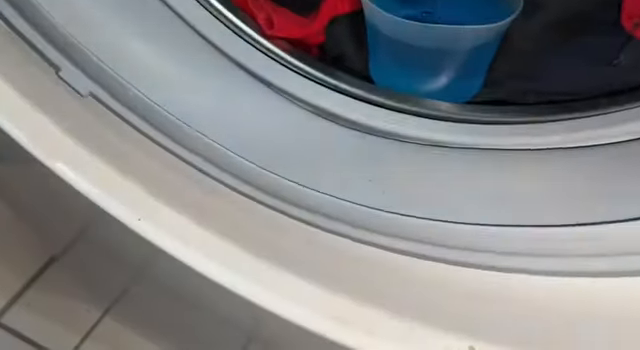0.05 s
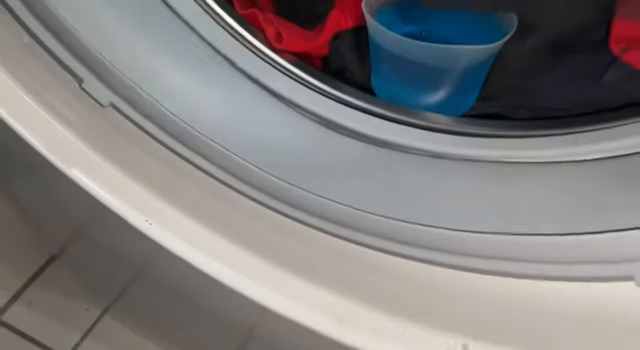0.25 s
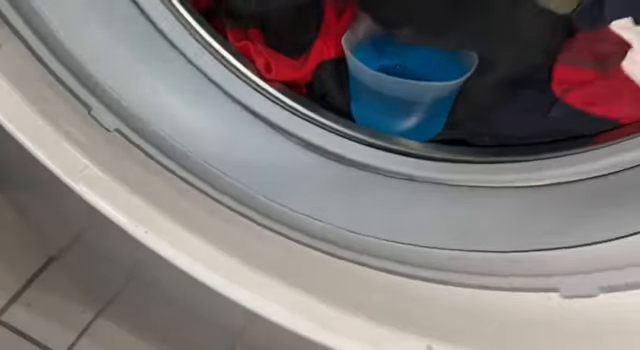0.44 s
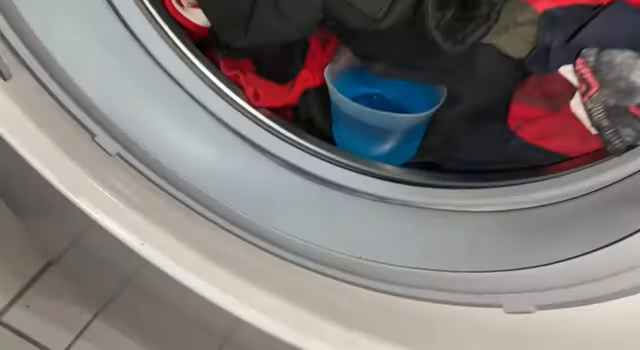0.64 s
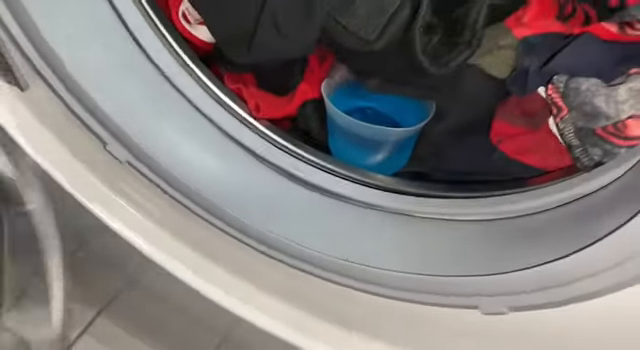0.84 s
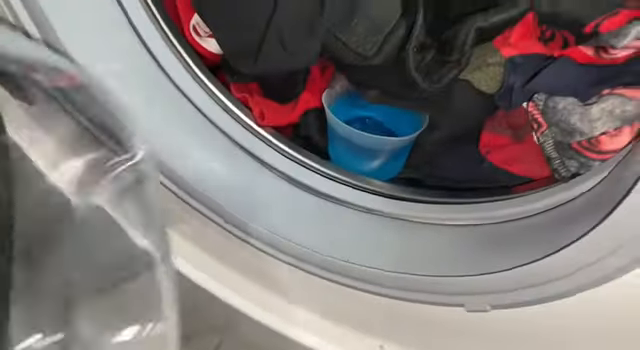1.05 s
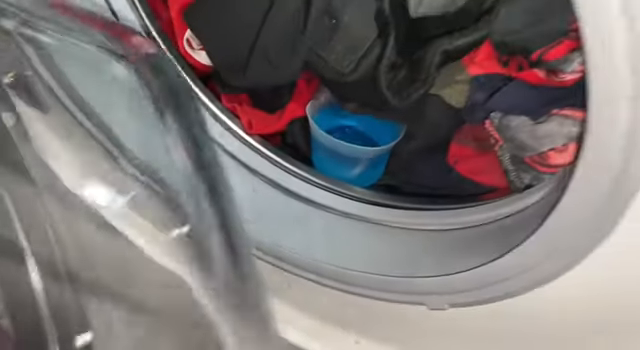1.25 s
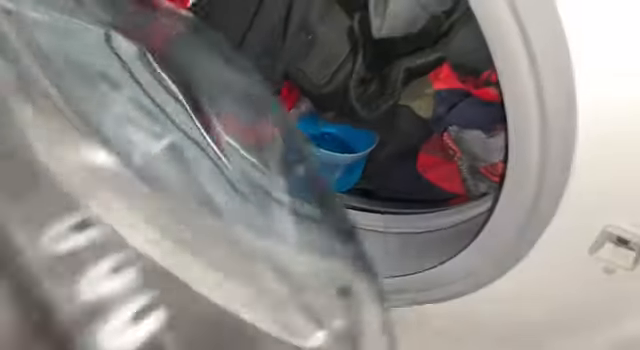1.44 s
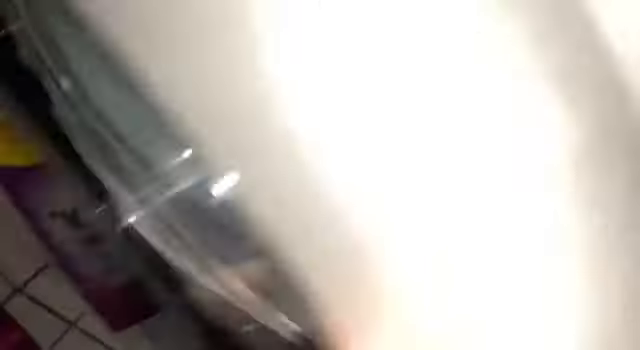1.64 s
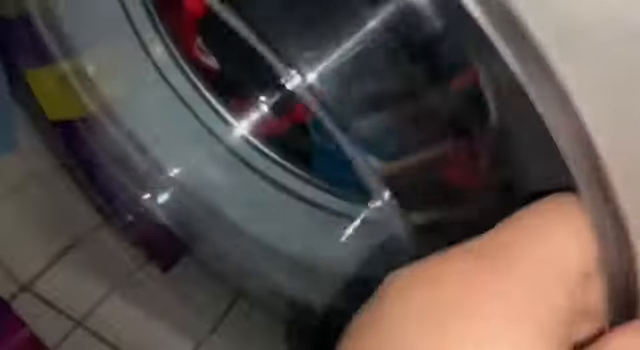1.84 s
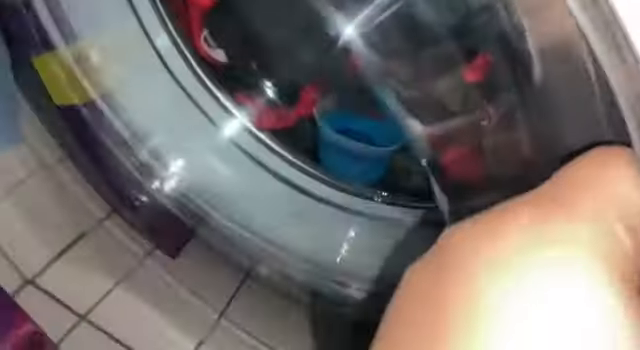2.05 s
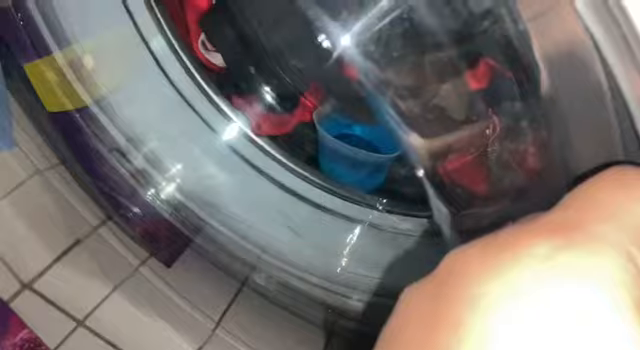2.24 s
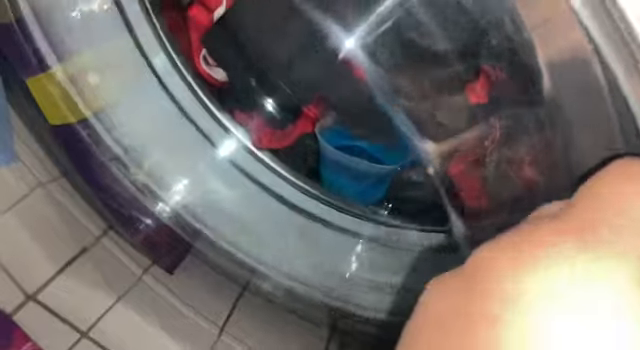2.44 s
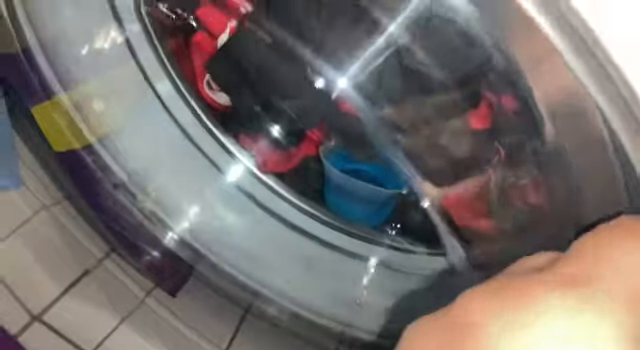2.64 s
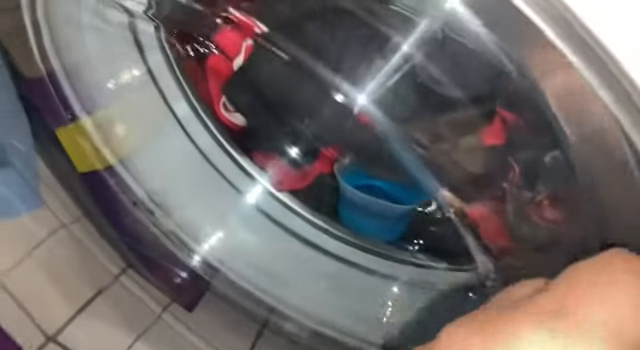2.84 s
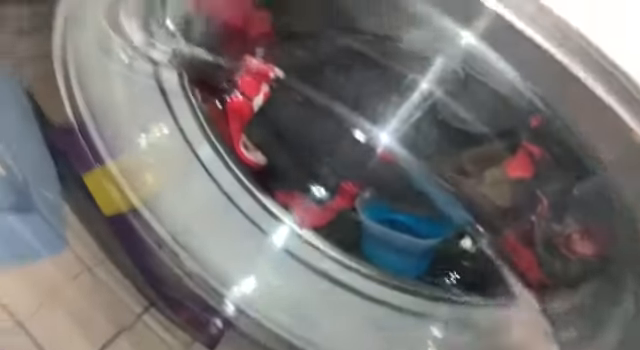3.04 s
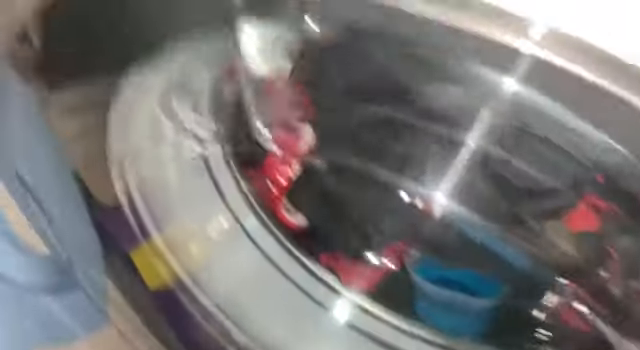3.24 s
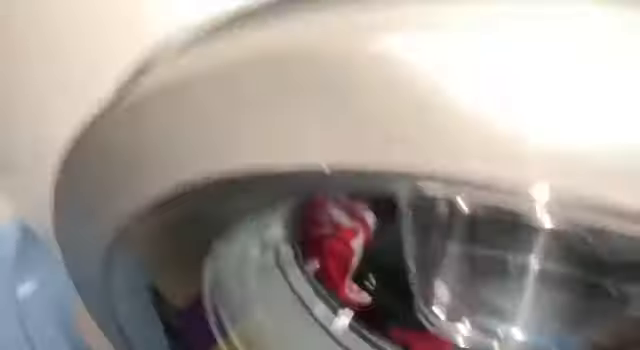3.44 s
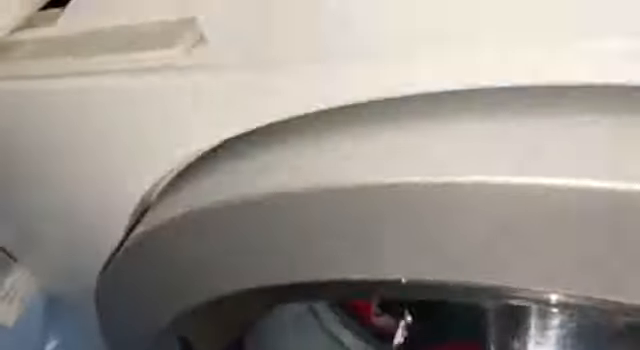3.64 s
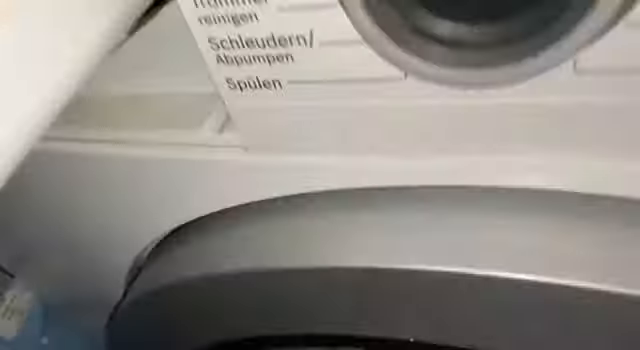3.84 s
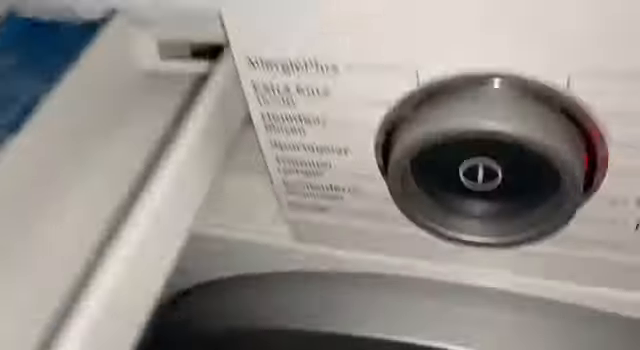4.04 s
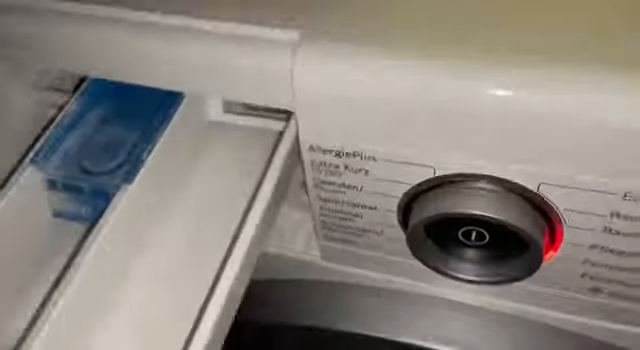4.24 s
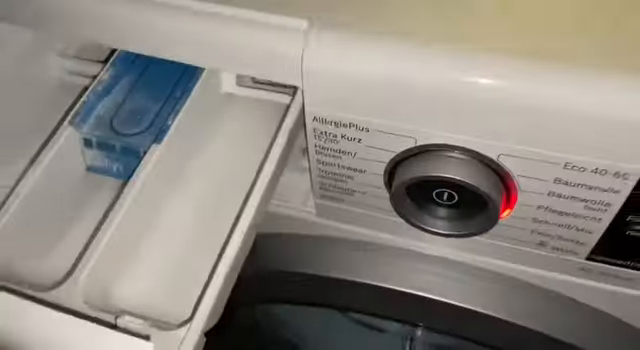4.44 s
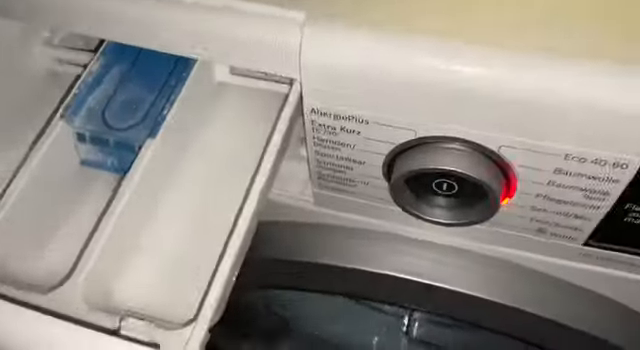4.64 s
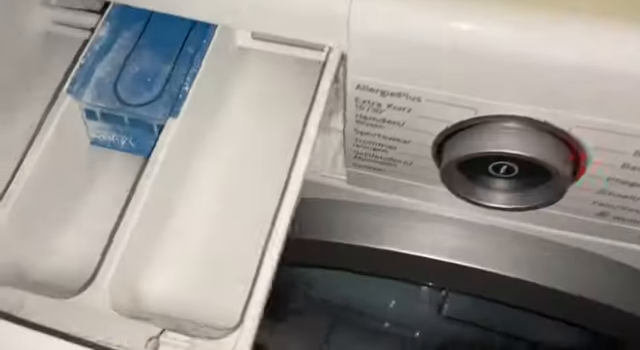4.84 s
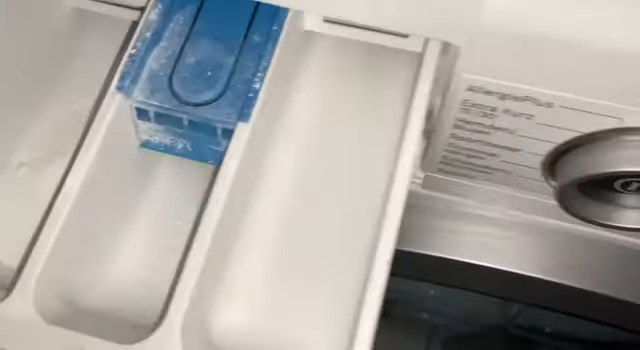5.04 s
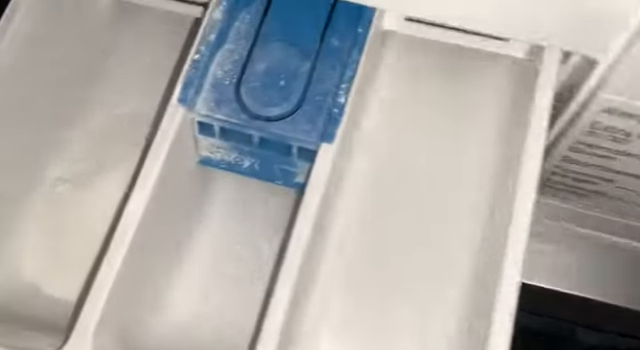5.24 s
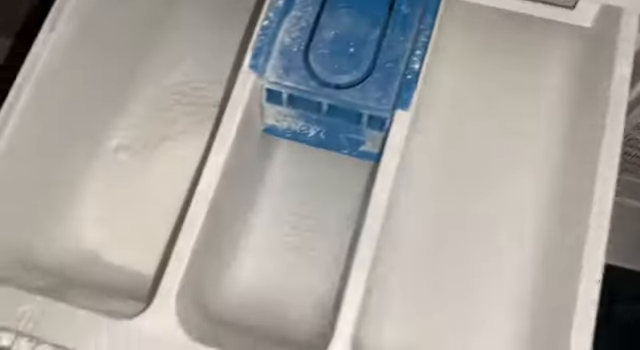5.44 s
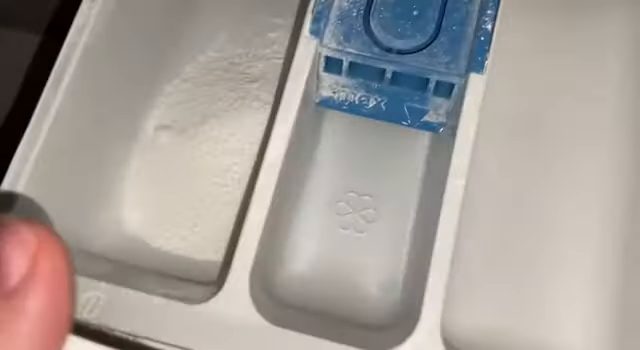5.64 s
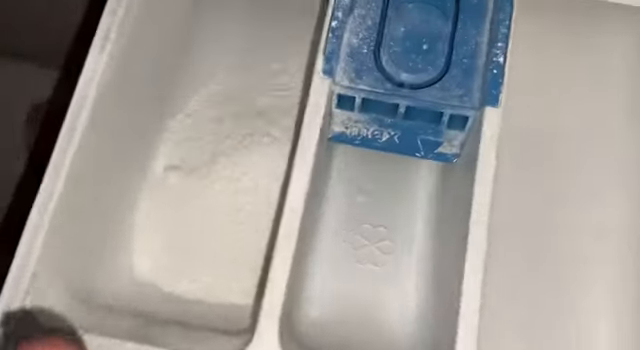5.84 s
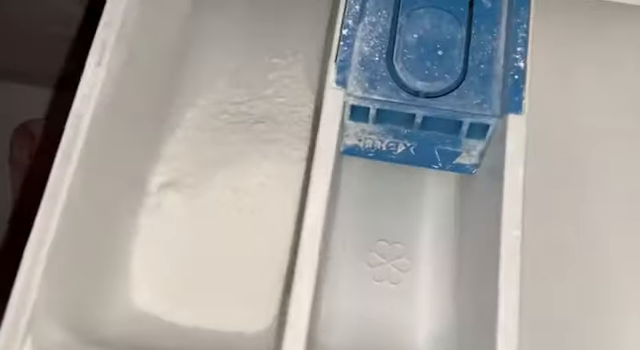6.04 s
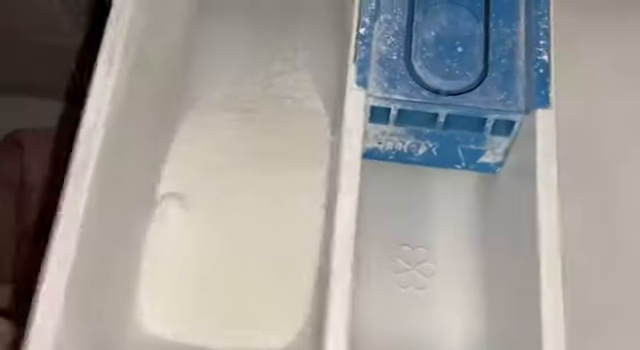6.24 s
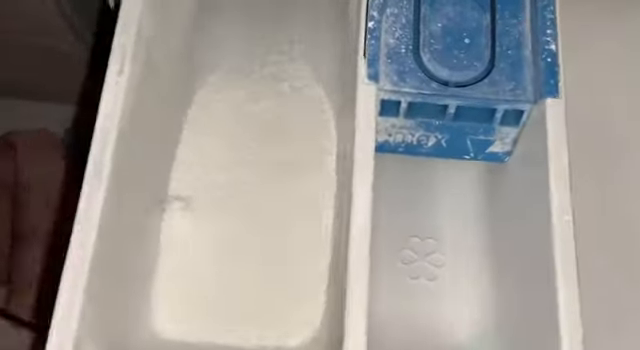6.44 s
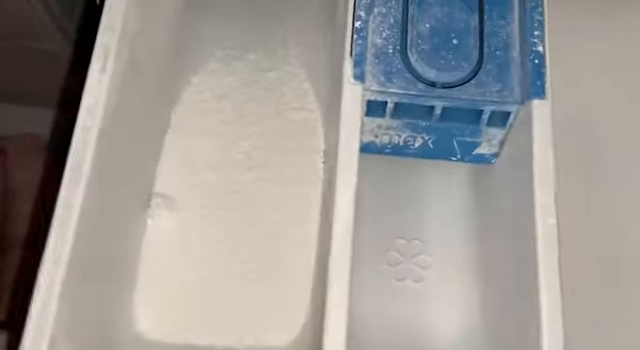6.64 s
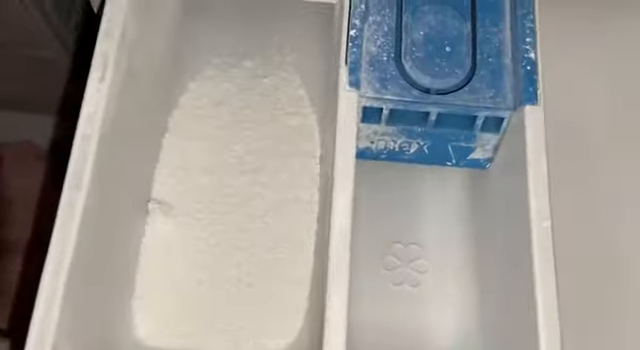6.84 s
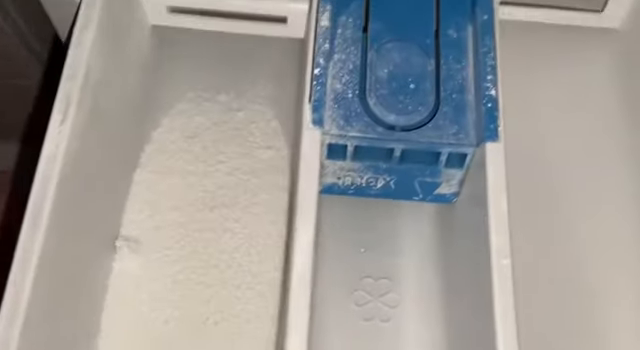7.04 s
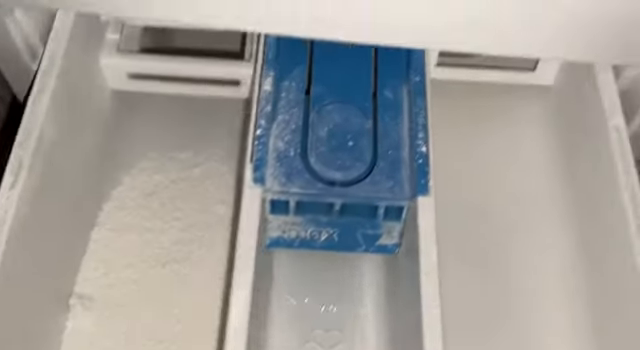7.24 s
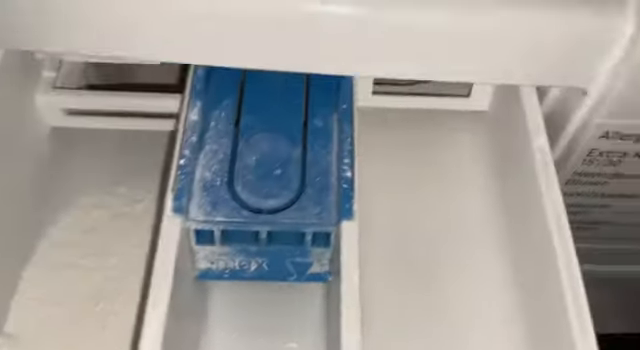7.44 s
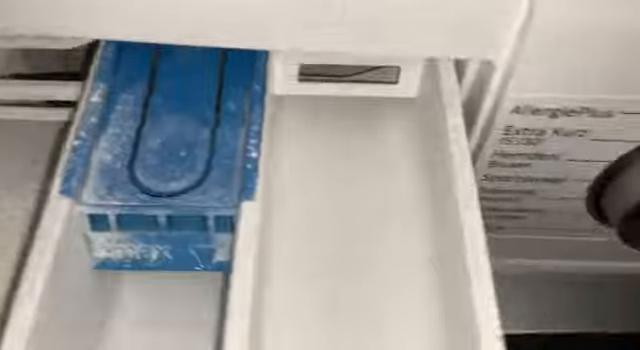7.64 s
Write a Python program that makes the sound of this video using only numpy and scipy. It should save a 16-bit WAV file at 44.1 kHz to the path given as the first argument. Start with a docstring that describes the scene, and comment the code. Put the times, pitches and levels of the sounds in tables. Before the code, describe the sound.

Close stereo handheld pickup with a low, faint room background. After a small brush, a door knocks lightly and half a second later bangs shut, by far the loudest event, latch clacking and cabinet ringing low. Dull fingertip taps and cloth scuffs fill the pause. A hollow plastic tray rattles back and forth for about a second, then quiet handling ends it.

```python
"""First a hand and sleeve brush about; then a washing machine door knocks its seal and is pressed home.
The latch snaps (short bursts of noise), the cabinet booms (ringing modes) and the handle creaks (a run of slips).
Next, fingers tap and rub a hand-held camera (damped notes, grainy noise) while the sleeve rustles (swelling noise).
Then the plastic detergent drawer is shaken to level the powder: it scrapes, knocks and flexes.
Last come a few more touches. A small tiled room answers door and drawer; two close microphone ports hear it all."""
import sys
import numpy as np
from scipy import signal
from scipy.fft import rfft, irfft, next_fast_len
from scipy.io import wavfile
from scipy.ndimage import map_coordinates

SR = 44100
rng = np.random.default_rng(int(sys.argv[2]) if len(sys.argv) > 2 else 0)


def to_wav(s):
    """Save 16-bit WAV."""
    ch = np.atleast_2d(s).T  # columns
    pcm = np.round(np.clip(ch, -1, 1) * 32767)  # PCM
    wavfile.write(sys.argv[1], SR, pcm.astype(np.int16))


N = 339570
TIME = np.arange(N) / SR
SIZE = next_fast_len(N + SR)  # filter length, with room for the ringing to die away
HZ = np.fft.rfftfreq(SIZE, 1 / SR)

# All table levels are relative: each layer also has its own gain in the mix.
# hand, rim, hook and latch contacts: [t/s, knock level/dB, snap level/dB above the knock]
LATCH_CONTACTS = [(0.555, -39, -39.5), (1.97, -31.5, -13), (1.981, -35.5, -18.5), (1.999, -41.5, -9.5),
                  (2.328, -46.5, -4.5), (2.357, -43.5, -7), (2.387, -23.5, -20.5), (2.395, -19.5, -9),
                  (2.427, -17.5, 6.5), (2.435, -14, -13.5), (2.446, -14.5, -11), (2.458, -11, -14),
                  (2.612, -26, -24)]
# broad colour of the door's knock: [f/Hz, level/dB]
DOOR_KNOCK_COLOUR = [(60, -8), (220, 6), (420, -1), (620, -2), (1200, -10.5), (1900, -15.5), (3500, -18.5),
                     (12000, -46)]
# resonances of the plastic rim: [f/Hz, width/Hz, level/dB]
RIM_MODES = [(806, 13, -5), (1291, 230, -1), (3565, 20, 3.5), (4135, 25, 0.5), (6050, 85, -5),
             (10900, 38, 5.5)]
# bright colour of hard contacts, for the door and the drawer: [f/Hz, level/dB]
SNAP_COLOUR = [(900, -16.5), (3000, 1.5), (5600, -0.5), (8300, -1.5), (12500, -15.5)]
# the handle creaks as the hand lets go, a short run of slips: [t/s]
CREAK_SLIPS = [2.6631, 2.679, 2.6945, 2.707, 2.716, 2.7297, 2.7445, 2.7606]
CREAK_DB = -40


def door():
    """The hook rides up its ramp, the plastic rim knocks, the latch snaps and chatters, and the handle creaks."""
    knocks = [(s, db) for s, db, _ in LATCH_CONTACTS]
    snaps = [(s, db + above_db) for s, db, above_db in LATCH_CONTACTS]
    creaks = [(s, CREAK_DB) for s in CREAK_SLIPS]

    strength = blows(knocks, t60=0.042, attack=0.0015)
    ramp = amp(-14) * run_ups(knocks, seconds=0.011)
    knock = noise(0.23) * (strength + ramp)

    chatter = amp(-4.0) * noise(0.49) + amp(-2.5) * grains(rate=2500, spread_db=2.5)
    snap = chatter * blows(snaps, t60=0.021, attack=0.00039)
    handle = noise(0.87) * blows(creaks, t60=0.01, attack=0.0002)

    rim = panel(RIM_MODES, share_db=7.5)
    dull = amp(1.5) * filtered(knock, colour(DOOR_KNOCK_COLOUR, rim))
    bright = filtered(amp(8.0) * snap + handle, colour(SNAP_COLOUR, rim))
    return dull + bright


# the door pushes on the cabinet: [t/s, level/dB, contact time/s]
DOOR_PUSHES = [(1.9789, -23.5, 0.0048), (1.9928, -34, 0.0071), (2.3941, -20.5, 0.0058),
               (2.4396, -8.5, 0.0051), (2.4477, 0, 0.0072)]
# ringing modes of the cabinet and drum: [f/Hz, level/dB, time to fall 60 dB/s]
CABINET_MODES = [(68.4, 1.5, 0.38), (64.3, 1, 0.77), (77, -2.5, 0.2), (93.7, -16, 0.75),
                 (141.3, -9.5, 0.55), (149.7, -8.5, 0.41), (192, -10.5, 0.34), (238.3, -16, 0.43),
                 (307.6, 4.5, 0.3), (377.5, -14, 0.6), (368.4, 8, 0.12), (460, -7, 0.28)]


def boom(cycles=0.81, rattle=0.7):
    """The cabinet swells over about a cycle after each push; a long contact spares its higher modes."""
    out = np.zeros((2, N))
    for hz, level, t60 in CABINET_MODES:
        mode = np.zeros(N)
        for s, db, contact in DOOR_PUSHES:
            softness = 1 + (hz * contact) ** 2
            add(mode, s, amp(level + db + 0.75) / softness * ring(hz, t60, cycles / hz))
        # the deepest modes are central and fairly steady;
        # the loose side panel, in the higher ones, rings unsteadily from the right
        loose = along([(90, 0), (200, 1)], hz)
        waver = 1 + rattle * loose * wobble(55) + .1 * wobble(24)
        out += pan(-4 * loose) * mode * waver
    return out


# the shaken drawer hits the end of its play and the tray flexes:
# [t/s, knock level/dB, flex level/dB, starting flex pitch f/Hz]
SHAKE_HITS = [(5.794, -35, -52, 225), (5.813, -32.5, -45, 221), (5.921, -26, -21, 240.4),
              (5.97, -37, -25.5, 235.6), (6, -24, -25, 232), (6.101, -27.5, -29, 232),
              (6.178, -18.5, -21, 192.4), (6.274, -25.5, -29.5, 183), (6.343, -17.5, -23, 182),
              (6.4, -25, -39, 217), (6.429, -22, -27.5, 236), (6.505, -16.5, -26.5, 242),
              (6.549, -33.5, -35, 199), (6.58, -24, -20, 219), (6.668, -40, -33.5, 226),
              (6.827, -30, -31.5, 290.5)]
# strength of the shaking over time: [t/s, friction level/dB, cabinet level/dB]
SHAKING_COURSE = [(5.8, -70.5, -71), (5.95, -44, -36), (6.15, -51.5, -40.5), (6.45, -43, -32.5),
                  (6.66, -57, -36.5), (6.74, -75, -42), (7.0, -94, -61.5)]
# the loose insert clicks in the tray: [t/s, level/dB]
INSERT_CLICKS = [(5.917, -36), (5.926, -35), (6.342, -35.5), (6.358, -31), (6.451, -39), (6.505, -32.5)]
# resonances of the plastic tray: [f/Hz, width/Hz, level/dB]
TRAY_MODES = [(552, 66, -10), (828, 46, -3), (1070, 44, -0.5), (1143, 71, -2.5), (1940, 69, -17),
              (5055, 75, -1), (5475, 320, -2)]
# broad colour of the tray's knock: [f/Hz, level/dB]
TRAY_KNOCK_COLOUR = [(60, -10), (240, 5.5), (400, -1.5), (1200, -3.5), (1600, -14), (2800, -10),
                     (3300, -18), (12000, -57.5)]
SLIDE_S, SLIDE_DB = 0.016, -12  # build-up time of the scrape before a knock, level relative to the knock
EDGE_DB = -28  # hard edge of a knock, relative to its body
ROVING_DB = 3.5  # change of colour as a contact wanders, for the drawer and the brushing hand


def drawer():
    """The shaken tray slips in grains along its rails, scraping ever louder until it knocks at the end of its play."""
    hits = [(s, db) for s, db, _, _ in SHAKE_HITS]
    edges = [(s, db + EDGE_DB) for s, db in hits]

    scrape = grains(rate=450, spread_db=5)
    slips = amp(-4.5) * scrape + amp(-9.0) * noise(1.0)
    # the first two hits have no slide before them
    speed = gains(SHAKING_COURSE)[0] + amp(SLIDE_DB) * run_ups(hits[2:], SLIDE_S)
    friction = speed * unit(amp(3 * wobble(70))) * slips

    knock = noise(0.64) * blows(hits, t60=0.045, attack=0.00061)
    snap = noise(0.49) * blows(INSERT_CLICKS + edges, t60=0.025, attack=0.00027)

    plastic = panel(TRAY_MODES, share_db=6.0)
    dull = filtered(amp(3.5) * knock + amp(4.5) * friction, colour(TRAY_KNOCK_COLOUR, plastic))
    body = (dull + tray_ring(hits)) * pan(-2.5)
    bright = filtered(amp(8.5) * snap + amp(-11) * friction, colour(SNAP_COLOUR, plastic))
    return roving(body + bright, ROVING_DB)


def tray_ring(hits, ring_db=1, scatter_db=3):
    """Each knock lands elsewhere on the tray and rings its modes in a new mix, the high ones more weakly."""
    out = np.zeros(N)
    mixes = rng.normal(0, 1, (len(hits), len(TRAY_MODES)))
    for (s, db), mix in zip(hits, mixes):
        for (hz, width, level), loud in zip(TRAY_MODES, mix):
            t60 = np.log(1000) / (np.pi * width)  # a narrow resonance rings longer
            gain = amp(ring_db + db + level + scatter_db * loud) / (1 + (hz / 1400) ** 2)
            add(out, s, gain * ring(hz, t60, attack=.5 / hz))
    return out


# the cabinet and tray under the shaking: [f/Hz, width/Hz, level/dB]
SHAKEN_MODES = [(87, 28, -5.5), (140.5, 4.6, 4.5), (237, 45, -8)]
FLEX_REST_HZ, FLEX_RELAX_S = 237.8, 0.06  # resting pitch of the bent tray, glide time constant
FLEX_ATTACK_S, FLEX_T60_S = 0.0065, 0.12


def tray_flex():
    """The whole tray bends with a hollow note that glides to its resting pitch, and shakes the cabinet behind it."""
    out, t = np.zeros(N), TIME[:SR // 2]
    for s, _, db, hz in SHAKE_HITS:
        pitch = FLEX_REST_HZ + (hz - FLEX_REST_HZ) * np.exp(-t / FLEX_RELAX_S)
        note = np.sin(2 * np.pi * np.cumsum(pitch) / SR)
        envelope = amp(db + 8.5 - 60 * t / FLEX_T60_S) * (1 - np.exp(-t / FLEX_ATTACK_S))
        add(out, s, envelope * note)
    shudder = filtered(noise(1.0), unit(resonances(SHAKEN_MODES)))
    cabinet = amp(-2.0) * gains(SHAKING_COURSE)[1] * shudder
    # the hand grips and releases the tray, so its note wavers in level
    waver = amp(2.1 * wobble(45))
    return (out * waver + cabinet) * pan(-2.5)


# fingers tap the camera's case: [t/s, level/dB, hardness (level of the upper notes)/dB]
FINGER_TAPS = [(3.324, -25, -12), (3.35, -30.5, -20), (3.617, -38.5, -1), (3.67, -32.5, 0),
               (3.777, -36.5, -2), (3.835, -38, 1), (3.88, -42.5, 3), (3.925, -42.5, 2), (4.008, -42, -5),
               (4.199, -37, -12), (4.257, -44, 8), (4.33, -30.5, -3), (4.436, -30.5, -3.5),
               (4.466, -46, -5), (4.578, -43.5, 0), (4.709, -39, 1), (4.72, -44, -2.5), (4.786, -40.5, 2),
               (4.799, -40, -1), (4.858, -50, -4), (4.958, -43.5, 4.5), (5.064, -42.5, 7.5),
               (5.259, -44.5, 8), (7.02, -35.5, -26.5), (7.08, -40.5, -24), (7.634, -46.5, 10.5)]
# the case's note shifts with the grip: [t/s, f/Hz]
CASE_NOTE = [(3.35, 580), (3.7, 495), (4.2, 556), (4.33, 650), (7.05, 614), (7.6, 462)]
# fingers slide over the case: [middle t/s, level/dB, half length/s]
FINGER_RUBS = [(3.352, -44, 0.027), (3.3, -52.5, 0.31), (4.05, -55, 0.43), (4.21, -48, 0.033),
               (4.44, -52.5, 0.088), (7.25, -64.5, 0.12), (7.6, -56.5, 0.05)]
# rumble relative to the rubbing; from GRIP_S on it fades for one second as the grip settles
SWAY_DB, SWAY_FADE_DB_PER_S, GRIP_S = 2, -18.5, 3.57


def handling():
    """Taps and slipping fingers sound the small camera case, which is damped almost at once."""
    taps = np.zeros(N)
    chances = rng.normal(0, 1, (len(FINGER_TAPS), 2))  # each tap sounds the upper notes a little differently
    for (s, db, hard_db), (a, b) in zip(FINGER_TAPS, chances):
        hz = np.interp(s, *np.transpose(CASE_NOTE))
        lowest = ring(hz, t60=0.016, attack=0.0014)
        upper = amp(a) * ring(1074, t60=0.027, attack=0.0019)
        upper += amp(b - 12.0) * ring(1410, t60=0.012, attack=0.00059)
        add(taps, s, amp(db + 5.5) * (lowest + amp(hard_db) * upper))

    skin = swells(FINGER_RUBS)
    slips = grains(rate=160, spread_db=-1) + noise(0.09)
    grip = unit(amp(3.5 * wobble(70)))
    case = colour([(200, -3.0), (430, -12.5), (530, 2.0), (680, -4.5),
                   (900, -11.0), (1600, -13.5), (3000, -44.5)])
    rub = skin * grip * filtered(slips, case)

    settled = amp(SWAY_DB + SWAY_FADE_DB_PER_S * np.clip(TIME - GRIP_S, 0, 1))
    rumble = filtered(noise(1.0), colour([(20, -11.0), (60, 0.5), (120, -9.5), (600, -41.5)]))
    return taps + amp(-5.5) * rub + skin * settled * rumble


# the sleeve rustles with each move of the arm: [middle t/s, level/dB, half length/s]
SLEEVE_MOVES = [(0.8, -66.5, 0.21), (1.6, -58.5, 0.13), (3.17, -60.5, 0.22), (3.98, -59.5, 0.19),
                (4.48, -64, 0.14), (5.17, -65.5, 0.2), (7.3, -64.5, 0.096)]
# colour of rustling cloth: [f/Hz, level/dB]
CLOTH_COLOUR = [(150, -4.5), (1400, -3.5), (2500, 9.5), (5500, 5), (11200, 2), (12000, -19.5)]
# strokes of hand and cloth on plastic:
# [t/s, level/dB, length/s, hollow body level/dB above the stroke, centre of the hiss f/Hz]
BRUSH_STROKES = [(0.568, -67.5, 0.059, 5, 1600), (0.59, -65.5, 0.48, -1, 3000),
                 (0.674, -61, 0.014, -12, 3000), (0.913, -59.5, 0.017, -7, 4430),
                 (1.038, -82.5, 0.39, 16.5, 1500), (1.89, -69, 0.14, 15.5, 3000),
                 (3.385, -56, 0.093, -31, 5000), (4.339, -53, 0.054, -15, 2100),
                 (4.63, -62.5, 0.056, -15, 3700), (4.835, -54.5, 0.071, -1.5, 4300),
                 (5.012, -52, 0.071, -10.5, 2230), (5.053, -57.5, 0.18, -16, 3600),
                 (5.411, -47, 0.08, -6.5, 4900), (5.54, -63.5, 0.12, 6.5, 2200),
                 (7.425, -60.5, 0.14, -18, 3020)]
# broad colour of the strokes: [f/Hz, level/dB]
BRUSH_COLOUR = [(100, 1), (750, 1.5), (1200, 10.5), (5800, 4.5), (12000, -6)]
# hollow hum of the stroked panel: [f/Hz, level/dB]
PANEL_COLOUR = [(60, -13.5), (140, 2.5), (330, -4), (1500, -19), (5000, -78)]
STROKE_Q, STROKE_RING_DB = 2, 4.5  # sharpness of a stroke's resonance, level relative to the broad hiss


def sleeve():
    """Cloth rustles as the arm moves; each stroke over the plastic has its own pitch, and the panel hums under it."""
    flutter = unit(amp(0.92 * wobble(29) + 1.9 * wobble(460)))
    rustle = swells(SLEEVE_MOVES) * flutter * filtered(noise(0.63), colour(CLOTH_COLOUR))

    hiss = filtered(noise(0.42), colour(BRUSH_COLOUR))
    scuff, pressure = np.zeros((2, N)), np.zeros(N)
    for s, db, length, body_db, hz in BRUSH_STROKES:
        u = np.maximum(TIME - s, 0) / length
        stroke = amp(db) * (1 - np.exp(-5 * u)) * np.exp(-u * u)
        pitched = filtered(hiss, panel([(hz, hz / STROKE_Q, 0)], share_db=STROKE_RING_DB))
        scuff += stroke * unit(pitched)
        pressure += amp(body_db) * stroke
    body = amp(7.0) * pressure * filtered(noise(0.8), colour(PANEL_COLOUR))
    return amp(4.0) * rustle + roving(amp(7.5) * scuff + body, ROVING_DB)


# how long the room rings: [f/Hz, time to fall 60 dB/s]
ROOM_DECAY = [(300, 0.4), (1500, 0.25), (11000, 0.23)]


def room(x):
    """Tiled walls answer a few milliseconds later; each frequency dies at its own speed."""
    hz, t, z = signal.stft(rng.standard_normal((2, SR * 3 // 4)), SR, nperseg=256)
    decay = amp(-60 * t / along(ROOM_DECAY, hz)[:, None])
    tail = signal.istft(z * decay, SR, nperseg=256)[1]
    tail[:, :SR // 200] = 0  # silent for the first 5 ms
    return signal.fftconvolve(x, tail / np.linalg.norm(tail[0]), axes=1)[:, :N]


# colour of the quiet room: [f/Hz, level/dB]
AMBIENT_COLOUR = [(35, -14.5), (62, 5.5), (90, -7.5), (140, -4.5), (380, -15), (560, -8.5), (1100, -25),
                  (12000, -34.5)]


def quiet_room():
    """A faint, mostly low background noise drifts slightly in level."""
    return amp(-64.5 + 0.41 * wobble(3.8)) * filtered(noise(0.24), colour(AMBIENT_COLOUR))


def amp(db):
    """Decibels to gain."""
    return 10 ** (np.asarray(db) / 20)


def unit(x):
    """Scale to rms 1."""
    return x / np.sqrt(np.mean(np.abs(x) ** 2) + 1e-20)


def along(points, hz=HZ):
    """Read (f/Hz, value) points on a log frequency axis."""
    f, v = np.transpose(points)
    return np.interp(np.log(hz + 1), np.log(f), v)


def gains(rows):
    """One gain per sample for each dB column, silent outside the table."""
    s, *columns = np.transpose(rows)
    return [amp(np.interp(TIME, s, c, left=-120, right=-120)) for c in columns]


def wobble(rate):
    """A smooth random curve with rate knots a second."""
    knots = rng.standard_normal(int(N * rate / SR) + 4)
    return map_coordinates(knots, [TIME * rate])


def filtered(x, response):
    """Pass x through a frequency response."""
    return irfft(rfft(x, SIZE) * response, SIZE)[..., :N]


def colour(points, extra=1):
    """Causal response of unit power with the given (f/Hz, level/dB) shape, times an extra gain."""
    # folding the cepstrum forward in time lets nothing sound before its cause
    cepstrum = irfft(np.log(amp(along(points)) * extra), SIZE)
    cepstrum[1:SIZE // 2] *= 2
    cepstrum[SIZE // 2 + 1:] = 0
    return unit(np.exp(rfft(cepstrum)))


def resonances(modes):
    """Summed response of (f/Hz, width/Hz, level/dB) resonances with alternating signs."""
    total = 0
    for k, (f, width, db) in enumerate(modes):
        damping = 1j * HZ * width
        total = total + (-1) ** k * amp(db) * damping / (f * f - HZ ** 2 + damping)
    return total


def panel(modes, share_db):
    """Gain of a moulded part: broad radiation with its resonances standing out."""
    return np.sqrt(1 + np.abs(amp(share_db) * resonances(modes)) ** 2)


def noise(alike):
    """White noise at the two ports, partly shared."""
    share = np.clip(alike, 0, 1)
    common = np.sqrt(share) * rng.standard_normal(N)
    return common + np.sqrt(1 - share) * rng.standard_normal((2, N))


def grains(rate, spread_db):
    """Tiny slips at random moments (rate a second on average), of random sign and size; rms 1."""
    happens = rng.random(N) < rate / SR
    sign = rng.choice([-1, 1], N)
    size = amp(spread_db * np.minimum(rng.exponential(size=N), 3))
    return unit(happens * sign * size)


def add(track, s, sound):
    """Mix a sound into a track at time s."""
    part = track[..., round(s * SR):][..., :sound.shape[-1]]
    part += sound[..., :part.shape[-1]]


def blows(rows, t60, attack):
    """Envelope of (t/s, level/dB) blows that rise fast and die away; overlapping powers add."""
    power, t = np.zeros(N), TIME[:SR // 2]
    for s, db in rows:
        add(power, s, (amp(db - 60 * t / t60) * (1 - np.exp(-t / attack))) ** 2)
    return np.sqrt(power)


def run_ups(rows, seconds):
    """Envelope of sliding that gathers speed up to each (t/s, level/dB) stop."""
    power = 0
    for s, db in rows:
        rise = np.exp(-np.abs(TIME - s) / seconds) * (TIME < s)
        power = power + (amp(db) * rise) ** 2
    return np.sqrt(power)


SWELL_SHAPE = 1.1  # 1 = pointed, 2 = rounded


def swells(rows):
    """Envelope of (middle t/s, level/dB, half length/s) movements that gather speed and slow down again."""
    power = 0
    for s, db, half in rows:
        swell = np.exp(-np.abs((TIME - s) / half) ** SWELL_SHAPE)
        power = power + (amp(db) * swell) ** 2
    return np.sqrt(power)


def ring(hz, t60, attack):
    """One struck mode: a sine that rises fast and dies away."""
    t = TIME[:3 * SR // 2]
    return np.sin(2 * np.pi * hz * t) * amp(-60 * t / t60) * (1 - np.exp(-t / attack))


def pan(left_db):
    """Gains of the two ports, with the left louder than the right by left_db."""
    return amp(np.array([[left_db], [-left_db]]) / 2)


def roving(x, depth_db):
    """As the contact wanders over a part, patches of its spectrum come and go."""
    z = signal.stft(x, nperseg=512)[2]
    patch = np.outer(np.hanning(8), np.hanning(16))
    field = signal.fftconvolve(rng.standard_normal(z.shape[1:]), patch, "same")
    return signal.istft(z * unit(amp(depth_db * unit(field))), nperseg=512)[1][:, :N]


def scene():
    """Door, drawer and handling over the quiet of the room."""
    shut, rattle, flex = door(), drawer(), tray_flex()
    walls = room(amp(-7.0) * shut + amp(-13.5) * rattle + amp(-13.5) * flex)
    return boom() + shut + rattle + flex + walls + handling() + sleeve() + quiet_room()


# phase between the microphone ports: [f/Hz, lead of the left port/rad]
PORT_LEAD = [(0, 0), (430, -.4), (800, -1.5), (1750, -6.3), (2700, -3.1), (4500, -3.5), (5500, -6.3),
             (6500, -3.2), (8300, -3), (9400, 0)]
LOW_CUT_HZ, TOP_HZ = 30, 12200  # partial bass cut, upper band limit
NOTCH_HZ, NOTCH_WIDTH_HZ = 7200, 1200  # dip of the microphone ports


def record(dry):
    """The ports differ in phase, weaken the deepest bass, notch the treble, round loud peaks and limit the band."""
    turn = np.exp(.5j * np.interp(HZ, *np.transpose(PORT_LEAD)))
    notch = 1 - resonances([(NOTCH_HZ, NOTCH_WIDTH_HZ, -1)])
    bass = 1 - 0.4 / (1 + (HZ / LOW_CUT_HZ) ** 8)
    ports = filtered(dry, np.array([turn, turn.conj()]) * notch ** 2 * bass)
    rounded = ports / (1 + np.abs(ports / .97) ** 8) ** (1 / 8)
    return filtered(rounded, 1 / np.sqrt(1 + (HZ / TOP_HZ) ** 160))


dry = scene()
out = record(dry)
to_wav(out)
```